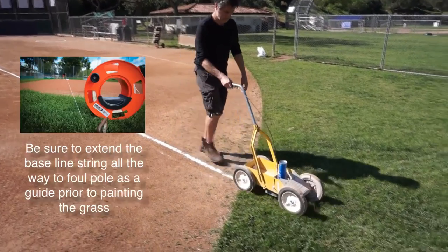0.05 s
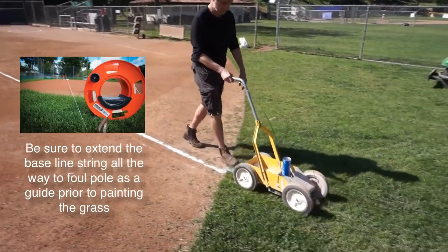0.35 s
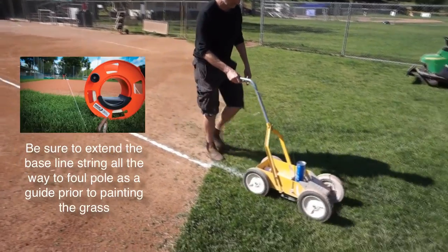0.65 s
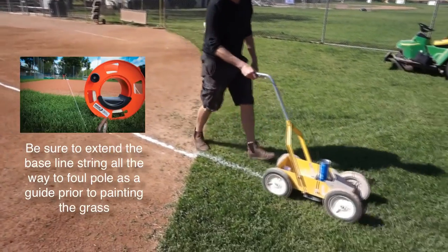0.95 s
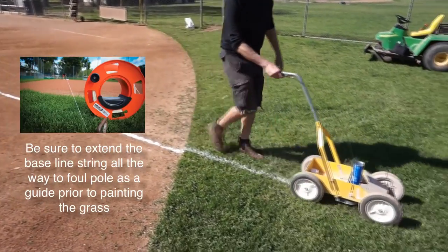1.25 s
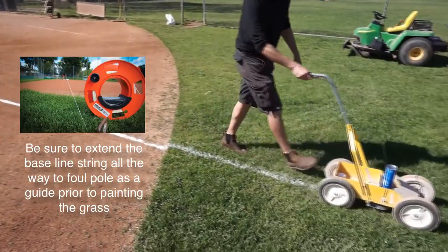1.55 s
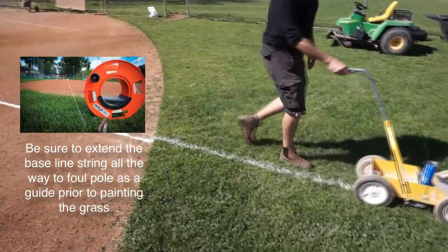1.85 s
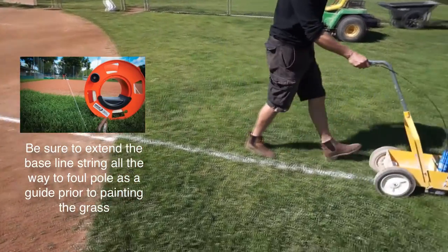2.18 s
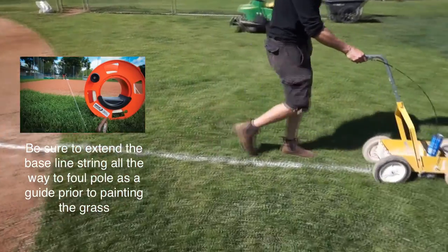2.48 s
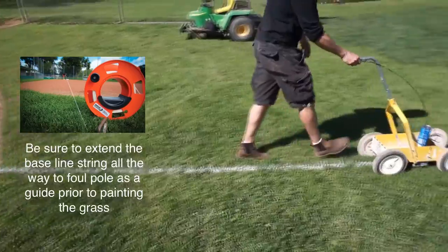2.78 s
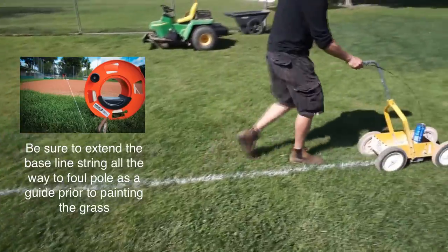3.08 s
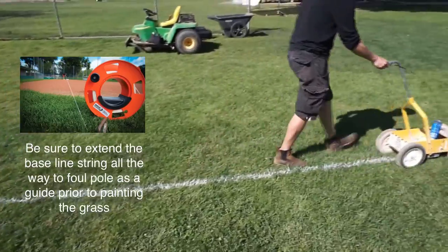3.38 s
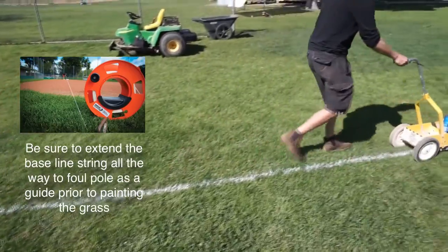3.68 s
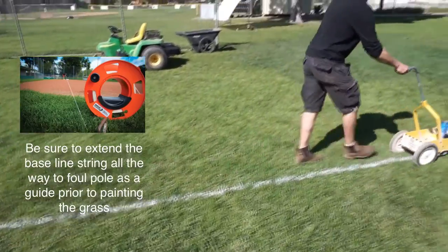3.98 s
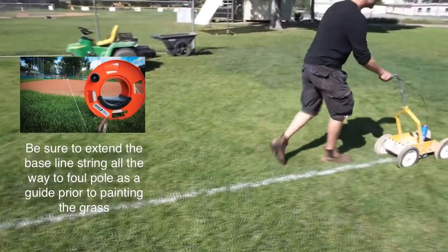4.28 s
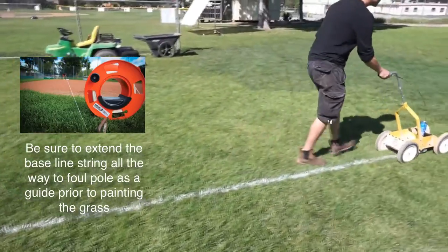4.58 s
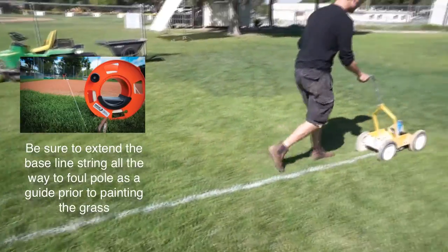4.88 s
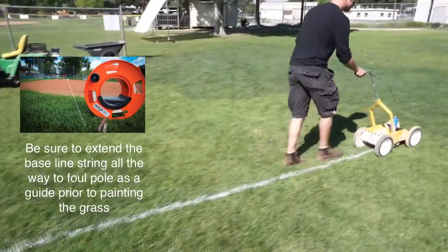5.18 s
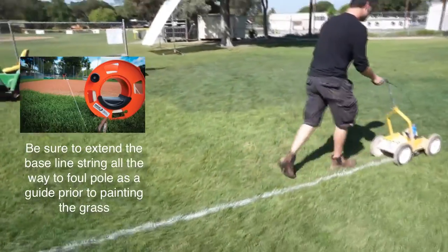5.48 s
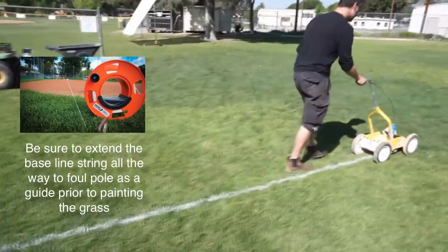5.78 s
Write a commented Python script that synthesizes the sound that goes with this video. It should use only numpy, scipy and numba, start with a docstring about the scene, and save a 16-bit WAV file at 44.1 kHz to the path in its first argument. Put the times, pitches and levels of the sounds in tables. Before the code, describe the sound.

A paint sprayer hisses steadily as its cart rolls and rattles over grass, with wind rumbling on the microphone.

```python
"""A line marker passing on a lawn

A four-wheeled cart is pushed past the microphone and away, its aerosol can spraying all the time.
The turbulent jet excites resonances of the steel chassis, the tyres crunch through grass, and bumps
set off clacks, rattles and thuds. A small engine drones far off, and wind buffets the microphone."""
import sys
import numpy as np
from scipy import signal
from scipy.fft import rfft, irfft
from scipy.io import wavfile
from scipy.ndimage import uniform_filter1d, map_coordinates
from numba import njit

SR = 44100
rng = np.random.default_rng(int(sys.argv[2]) if len(sys.argv) > 2 else 0)


def generate_wav(sig):
    """Save sig (samples, or channels by samples) to the path in sys.argv[1] as 16-bit PCM at SR."""
    pcm = np.round(np.clip(np.atleast_2d(sig).T, -1, 1) * 32767).astype(np.int16)
    wavfile.write(sys.argv[1], SR, pcm)


N = 266805
TIME = np.arange(N) / SR
FREQ = np.fft.rfftfreq(N, 1 / SR)
SIDES = np.array([[1], [-1]])  # left and right microphone ports

# loudness of the hiss: t/s, level/dB
JET_LEVEL = [(0.0, -31), (0.95, -33), (1.2, -35.5), (1.65, -35.5), (1.9, -33), (2.25, -32), (2.5, -30),
             (3.2, -31), (3.75, -32), (4.1, -39.5), (4.75, -38.5), (6.05, -40.5)]
# spectrum of the jet: f/Hz, relative level/dB
JET_SPECTRUM = [(1000.0, -17.5), (2100.0, -1.5), (2850.0, -1), (3600.0, -0.5), (5000.0, -0.5),
                (6200.0, 2.2), (8000.0, 3.5), (10500.0, 3.5), (12500.0, 2.5), (14500.0, -0.5),
                (16000.0, -10)]
# reflection off the chassis wall: t/s, delay/ms, coefficient (negative inverts)
WALL_REFLECTION = [(0, 0.37, 0.11), (.7, 0.35, -0.18), (1.2, 0.37, -0.017), (1.55, 0.44, -0.13),
                   (2.15, 0.39, 0.037), (2.65, 0.34, 0.28), (3.05, .37, -0.16), (3.5, 0.4, -0.11),
                   (4.6, 0.35, -0.081), (6.05, 0.43, 0.00058)]
# chassis resonances, beamed at the microphone in turn:
# f/Hz, bandwidth/Hz, relative level/dB, facing at t/s, half-duration/s, glide/(Hz/s)
CAVITY_MODES = [(3600, 540, -8, 1.5, .7, -100), (4300, 770, -3.5, 1.3, 0.42, 200),
                (3900, 300, -10.5, 3.06, 0.33, 696), (5100, 270, -9.5, 5.35, 0.66, 50),
                (5370, 650, -11, 2.66, 0.13, 1300), (6960, 380, -3.5, 0.11, 0.13, -300),
                (7140, 520, -7, .75, .3, 600), (6650, 800, -2.5, 1.27, 0.17, -1200),
                (7040, 670, -3, 1.95, 0.26, 1500), (6900, 380, -3.5, 3.2, 0.12, 400),
                (6830, 250, -7.5, 4.54, 0.81, -80), (8330, 310, -7, 0.42, 0.27, 500),
                (8400, 500, 2, 2.7, 0.063, 300), (7950, 660, -8, 3.55, 0.38, -300),
                (8900, 730, -3, 4.86, 0.99, -60), (9200, 540, -4.5, 2.44, .17, 1803),
                (9500, 1100, -5, 0.98, .15, -1500), (4100, 320, -16.5, 4.8, .9, 0),
                (6700, 470, -11, 2.5, 0.081, 0), (10700, 1500, -7.5, 0.46, 0.75, 400)]


def spray(scatter=0.71, sputter_db=1.0, sway_db=0.9, shadow_s=5, shadow_db=-31, shadow_hz=6000):
    """Turbulence radiates broadband noise, comb-filtered by the wall and joined by cavity resonances."""
    wall_ms, reflection = curves(WALL_REFLECTION)
    jet = colour(noise(), JET_SPECTRUM)
    jet = jet + reflection * delay(jet, wall_ms)
    jet = jet + scatter * scattered(jet)
    shadow = undb(shadow_db * smooth_step(shadow_s, 0.096))  # from behind, the chassis hides high modes
    for hz, width_hz, db, facing, half, glide in CAVITY_MODES:
        centre_hz = gliding(hz, glide, facing, half)
        ring = unit(resonate(resonate(noise(), centre_hz, width_hz), centre_hz, 2 * width_hz))
        beam = undb(db + sway_db * walk(9.6)) * swell(facing, half)
        jet = jet + ring * beam * (shadow if hz > shadow_hz else 1)
    return jet * undb(curves(JET_LEVEL)[0] + sputter_db * walk(26))


def scattered(x, t60=0.019, hop=5000):
    """Multiple scattering among wheels and frame: the echo pattern fades into a new one every hop."""
    out, age = np.zeros(N), TIME[:1024]
    decay = np.exp(-np.log(1000) * age / t60) * (age > .001)
    window = signal.windows.cosine(2 * hop)
    for start in range(0, N, hop):
        piece = x[start:start + 2 * hop]
        tail = rng.standard_normal(len(age)) * decay
        echo = signal.fftconvolve(piece * window[:len(piece)], tail / np.linalg.norm(tail))
        out[start:start + len(echo)] += echo[:N - start]
    return out


# loudness of rolling: t/s, level/dB
ROLLING_LEVEL = [(0.0, -35), (0.3, -35.5), (1.1, -38.5), (1.7, -36.5), (2.35, -33), (2.75, -29),
                 (3.15, -28), (3.45, -26.5), (3.83, -29), (3.95, -35), (5.1, -35), (6.05, -36)]
# spectrum of crushed grass: f/Hz, relative level/dB
GRASS_SPECTRUM = [(150, 6.5), (300, 2.5), (450, -5), (700, -1.5), (1100, 1.5), (1700, -2.5), (2050, -3.5),
                  (2800, -8), (3500, -10), (5000, -9.5), (8000, -18), (15000, -30)]
# brief scuffs through the grass: t/s, peak level/dB, half-duration/s
GRASS_SCUFFS = [(2.692, -29, .03), (3.398, -29, 0.024), (4.26, -35.5, 0.072), (4.46, -39, 0.09),
                (4.8, -33, 0.041), (5.098, -35, 0.051), (5.344, -36.5, 0.12)]
# deck resonances driven by rolling: f/Hz, bandwidth/Hz, gain/dB
DECK_MODES = [(714, 120, -9), (1090, 350, -13), (2050, 160, -9.5)]


def wheels(crunch=0.45, uneven_db=0.69, jolt_gain=0.086, press_s=0.018, jolt_t60=0.33):
    """Friction and fracture: grass brushes and snaps under the tyres, forcing the deck to vibrate."""
    blades = noise() + crunch * grains(rate=900, spread_db=2.5)
    # each clack marks a jolt that presses the tyres harder into the grass
    jolts = np.max([burst(start, press_s, jolt_t60) for start, *_ in PART_IMPACTS], axis=0)
    rolling = (1 + jolt_gain * jolts) * undb(curves(ROLLING_LEVEL)[0] + uneven_db * walk(17))
    scuffs = sum(undb(db) * swell(peak_s, half) for peak_s, db, half in GRASS_SCUFFS)
    rustle = colour(blades, GRASS_SPECTRUM)
    return unit(rustle + modal_response(rustle, DECK_MODES)) * np.hypot(rolling, scuffs)


# loose parts striking the frame: t/s, level/dB, treble gain/dB, ring f/Hz
PART_IMPACTS = [(0.022, -28, -6, 1520), (0.081, -25, -27, 1240), (.632, -23.5, -19, 2170),
                (1.798, -28.5, -9, 1640), (1.973, -30, -16, 1700), (2.012, -24, -5.5, 1630),
                (2.198, -29.5, 0, 2070), (2.468, -26, 0.5, 2050), (2.501, -21, -7, 1660),
                (2.7855, -20, -4.5, 2040), (2.837, -26, -2, 1680), (2.851, -19.5, -7.5, 1260),
                (3.427, -21.5, -6.5, 2110), (3.72, -27.5, 3.5, 2280), (3.957, -31, 3, 2260),
                (4.028, -27.5, 2, 2170), (4.379, -32, -2, 2270), (4.987, -28, 1.5, 1910),
                (5.054, -31.5, -7, 1910), (5.064, -38, -8, 2500), (5.86, -32.5, -0.5, 2300),
                (5.939, -31.5, -3.5, 1900)]
# modes of the steel frame: f/Hz, bandwidth/Hz, gain/dB
FRAME_MODES = [(1045, 37, 5.5), (2600, 35, -12), (4220, 200, -1.5), (5070, 260, 3), (6550, 710, 4),
               (8240, 690, -9)]


def clacks(chatter=0.47, split_hz=4500, part_ring=1.73, part_width_hz=420):
    """Impact excitation: a brief chattering contact rings the loose part and the modes of the frame."""
    contacts = noise() + chatter * grains(rate=1400, spread_db=5.0)
    contacts = colour(contacts, [(300, -9), (800, -3.0), (1700, 3.5), (2800, 2.5), (4200, 1.5),
                                 (6500, -0.5), (9500, 7.0), (12000, -4.5), (16000, -35)])
    top = treble(contacts, split_hz)
    force, parts = 0, 0
    for start, db, treble_db, hz in PART_IMPACTS:
        envelope = undb(db) * burst(start, rise=0.001, t60=0.069, hold=0.0051)
        blow = envelope * (contacts - top + undb(treble_db) * top)
        force = force + blow
        parts = parts + resonate(blow, hz, part_width_hz)
    return force + part_ring * parts + modal_response(force, FRAME_MODES)


def rattle(rise=0.012, t60=0.22, relative_db=-11):
    """Repeated collisions: small fittings jiggle after each jolt with a decaying, gritty patter."""
    shaking = np.max([undb(db) * burst(start, rise, t60) for start, db, *_ in PART_IMPACTS], axis=0)
    ticks = grains(rate=600, spread_db=2.0)
    patter = colour(ticks, [(300, -15), (900, 5), (2200, -1), (5500, -8.5), (12000, -23)])
    return patter * shaking * undb(relative_db)


# hollow knocks of the chassis: t/s, peak level/dB, f/Hz
CHASSIS_KNOCKS = [(0.027, -30, 660), (0.049, -28.5, 465), (.08, -35, 640), (.228, -34.5, 540),
                  (.635, -34, 494), (0.654, -32, 720), (1.23, -35.5, 440), (1.8, -33, 360),
                  (2.017, -34.5, 326), (2.495, -29.5, 316), (2.508, -34, 563), (2.68, -33, 420),
                  (2.792, -29, 340), (3.37, -31, 506), (3.48, -29.5, 296), (3.72, -31.5, 298),
                  (4.801, -36.5, 250), (5.06, -37, 340)]


def bumps(rise=0.013, width_hz=300, t60_cycles=110):
    """Damped vibration: each thud of the chassis lasts equally many cycles, so low ones ring longer."""
    thuds = 0
    for start, db, hz in CHASSIS_KNOCKS:
        ring = unit(resonate(resonate(noise(), hz, width_hz), hz, 3 * width_hz))
        thuds = thuds + undb(db) * burst(start, rise, t60_cycles / hz) * ring
    return thuds


# cancellations: f/Hz, bandwidth/Hz, depth (0-1), deepest at t/s, half-duration/s, glide/(Hz/s)
PATH_NOTCHES = [(2880, 440, 0.55, 1.2, 0.51, -80), (4940, 710, 0.64, 1.04, 1, -100),
                (3220, 500, 0.8, 2.22, 0.2, -300), (4260, 350, 0.5, 2.5, 0.21, 1100),
                (4800, 310, 0.54, 3.2, 0.75, -100), (5800, 550, 0.4, 4.1, 1, -300)]


def multipath(x):
    """Destructive interference of paths round the wheels cuts notches that slide as the cart moves."""
    for hz, width_hz, depth, deepest, half, glide in PATH_NOTCHES:
        band = resonate(x, gliding(hz, glide, deepest, half), width_hz)
        x = x - depth * swell(deepest, half) * band
    return x


# reflection off the lawn: t/s, delay/ms, coefficient (negative inverts)
LAWN_REFLECTION = [(0, 0.47, -0.058), (1.2, 0.62, -0.0076), (2.1, 0.644, -0.074), (2.35, 0.72, -0.019),
                   (2.65, 0.68, -0.21), (3.05, 0.68, 0.066), (3.6, 0.76, -0.1), (3.95, 0.64, 0.012),
                   (5, 1.43, 0.044), (6.05, 1.4, -0.048)]


def ground_effect(x):
    """Direct and ground-reflected waves interfere, forming a shifting comb filter."""
    delay_ms, reflection = curves(LAWN_REFLECTION)
    return x + reflection * delay(x, delay_ms)


# direction of the cart: t/s, offset from the microphone axis (0-1)
CART_BEARING = [(0, .02), (1.55, 0.03), (2.1, 0.52), (4, 0.86), (6.05, 0.16)]


def at_ports(cart, port_lag_ms=0.053, treble_spread=0.54, spread_hz=4800, top_hz=11500):
    """Path difference and lost coherence: as the cart moves right, its treble differs between ports."""
    off_axis, = curves(CART_BEARING)
    lag_ms, spread = port_lag_ms * off_axis, treble_spread * off_axis
    diffuse = spread * multipath(spray())
    gradient = (delay(cart, lag_ms) - delay(cart, -lag_ms)) / 4
    # off axis, the shortest waves are shared least
    mid = cart - spread * treble(cart, top_hz)
    side = treble(gradient + diffuse, spread_hz) + treble(diffuse, top_hz)
    return mid + SIDES * side


# loudness of the far engine: t/s, level/dB
ENGINE_LEVEL = [(0, -41), (1.55, -36), (1.9, -29.5), (2.1, -41.5), (2.27, -27.5), (2.45, -32), (3, -27.5),
                (3.4, -25.5), (3.8, -24.5), (4, -34), (6.05, -37.5)]


def engine(hum_hz=132.24, sag_hz=9, wander=0.0067, waver=0.34, overtone_db=-19.5, left_db=2.6):
    """Periodic exhaust flow gives a note that wavers in the wind; uneven firing adds half orders."""
    hz = hum_hz - sag_hz * smooth_step(3.2, 1.2)
    phase = 2 * np.pi * np.cumsum(hz * (1 + wander * walk(7.5))) / SR
    drone = 0
    for order, gain in (1, 1), (5 / 2, undb(overtone_db)), (7 / 2, undb(overtone_db) / 2):
        in_phase = (1 + waver * walk(27.0)) * np.sin(order * phase)
        quadrature = waver * walk(8.5) * np.cos(order * phase)
        drone = drone + gain * (in_phase + quadrature)
    return unit(drone) * undb(curves(ENGINE_LEVEL)[0] + SIDES * left_db)


# strength of the wind's rumble: t/s, level/dB
WIND_LEVEL = [(0, -11), (.22, -13.5), (.6, -5), (.95, -12.5), (1.12, -13.5), (1.56, -7), (1.66, -15.5),
              (2.48, -20), (2.68, -9), (2.85, -10), (3, -14), (3.2, -9.5), (3.4, -22), (3.8, -11),
              (4.8, -15), (5.15, -16.5), (5.55, -4.5), (6.05, -8.5)]
# single eddies striking the ports: t/s, peak level/dB, half-duration/s
EDDY_STRIKES = [(0.58, -22, 0.061), (1.132, -10.5, 0.17), (1.467, -15.5, 0.09), (3.836, -14.5, 0.21),
                (4.353, -21, 0.21), (5.554, -20.5, 0.12)]
# spectra of the wind's pressure: f/Hz, relative level/dB
RUMBLE_SPECTRUM = [(3, 0), (8, -40), (15, 27), (26, 9), (42, 9), (55, -6.5), (75, -43), (120, -74)]
BUFFET_SPECTRUM = [(30, -3), (55, 0), (80, 1), (105, -2.5), (150, -7.5), (220, -26.5), (350, -26),
                   (800, -72), (3000, -83)]
THUMP_SPECTRUM = [(15, -4), (35, 2), (55, 4), (80, -10.5), (120, -21), (200, -32), (500, -54), (3000, -93)]


def wind(ceiling=0.89, buffet_db=-30, buffet_follow=0.13, flutter_db=2.0):
    """Turbulent pressure, only partly coherent between the ports, rumbles, buffets and thumps."""
    rumble_db, = curves(WIND_LEVEL)
    rumble = (eddies(RUMBLE_SPECTRUM) + .8 * SIDES * eddies(RUMBLE_SPECTRUM)) * undb(rumble_db)
    swirl = eddies(BUFFET_SPECTRUM)
    buffet = eddies(BUFFET_SPECTRUM) + .6 * SIDES * (swirl - treble(swirl, 220))
    buffet = buffet * undb(buffet_db + buffet_follow * rumble_db + flutter_db * walk(7.6))
    strikes = sum(undb(db) * swell(peak_s, half) for peak_s, db, half in EDDY_STRIKES)
    thumps = (eddies(THUMP_SPECTRUM) + SIDES * eddies(THUMP_SPECTRUM) / 2) * strikes
    return ceiling * np.tanh((rumble + thumps) / ceiling) + buffet  # the strongest swings saturate


def eddies(spectrum, evenness=0.15):
    """Envelope compression of low noise makes successive swirls more alike in strength."""
    x = colour(noise(), spectrum)
    strength = uniform_filter1d(np.abs(signal.hilbert(x)), size=1500)
    return unit(x / strength ** evenness)


# spectrum of the open air: f/Hz, relative level/dB
AMBIENT_SPECTRUM = [(60, 23.5), (170, 12.5), (280, -3), (450, 11), (720, 9), (1150, -9), (1500, -19),
                    (2500, -50), (6000, -50), (15000, -53)]


def open_air(level_db=-38.5, side=0.2):
    """Ambient noise reaches two closely spaced ports largely in phase."""
    shared = colour(noise(), AMBIENT_SPECTRUM)
    return (shared + side * SIDES * colour(noise(), AMBIENT_SPECTRUM)) * undb(level_db)


def undb(db):
    """Decibels to amplitude ratio."""
    return 10 ** (np.asarray(db) / 20)


def unit(x):
    """Normalisation to rms 1."""
    return x / np.sqrt(np.mean(x ** 2))


def curves(rows):
    """Linear interpolation in time of each column after the first."""
    times, *columns = np.transpose(rows)
    return [np.interp(TIME, times, column) for column in columns]


def noise():
    """Gaussian white noise."""
    return rng.standard_normal(N)


def grains(rate, spread_db):
    """Shot noise: rate random clicks a second, a few much larger than the rest."""
    clicks = (rng.random(N) < rate / SR) * noise()
    return unit(clicks * undb(spread_db * np.minimum(rng.exponential(size=N), 4)))


def walk(rate, size=2048):
    """Band-limited fluctuation of rms 1, changing about rate times a second."""
    step = N / SR / size
    low_pass = np.exp(-(np.fft.rfftfreq(size, step) / rate) ** 2)
    slow = irfft(rfft(rng.standard_normal(size)) * low_pass)
    return np.interp(TIME, step * np.arange(size), unit(slow))


def burst(start, rise, t60, hold=0):
    """Envelope of a blow: linear rise, hold, then exponential decay."""
    age = np.maximum(TIME - start, 0)
    return np.minimum(age / rise, 1) * np.exp(-np.log(1000) * np.clip((age - rise - hold) / t60, 0, 2))


def swell(centre, half):
    """Gaussian envelope, down to 1/e at half seconds from its centre."""
    return np.exp(-((TIME - centre) / half) ** 2)


def smooth_step(centre, half):
    """Sigmoid transition from 0 to 1."""
    return (1 + np.tanh((TIME - centre) / half)) / 2


def gliding(hz, hz_per_s, centre, half, sway=0.008):
    """Frequency modulation: a linear glide about time centre, with drift as the cart sways."""
    return (hz + hz_per_s * np.clip(TIME - centre, -2 * half, 2 * half)) * (1 + sway * walk(4.6))


def colour(x, spectrum):
    """Spectral shaping by (f/Hz, level/dB) points, at rms 1."""
    hz, db = np.transpose(spectrum)
    return unit(irfft(rfft(x) * undb(np.interp(np.log(FREQ + 1), np.log(hz), db)), N))


def treble(x, hz):
    """Zero-phase high-pass above hz."""
    return irfft(rfft(x) * (1 - 1 / (1 + (FREQ / hz) ** 6)), N)


def delay(x, ms):
    """Time-varying propagation delay."""
    return map_coordinates(x, [np.arange(N) - ms * SR / 1000], order=3, mode="wrap")


@njit
def svf(x, hz, width_hz):
    """State-variable band-pass whose centre may move every sample."""
    y, band_state, low_state = np.empty(len(x)), 0., 0.
    for i in range(len(x)):
        gain, damping = np.tan(np.pi * hz[i] / SR), width_hz / hz[i]
        band = (band_state + gain * (x[i] - low_state)) / (1 + gain * (gain + damping))
        band_state, low_state = 2 * band - band_state, low_state + 2 * gain * band
        y[i] = damping * band
    return y


def resonate(x, hz, width_hz):
    """Forced response of one resonance, steady or moving."""
    return svf(x, hz * np.ones(len(x)), float(width_hz))


def modal_response(force, modes):
    """Superposition of modes driven by one force."""
    return sum(undb(db) * resonate(force, hz, width_hz) for hz, width_hz, db in modes)


def scene():
    """Superposition at the two ports: the cart over the lawn, then engine, wind and open air."""
    cart = multipath(spray() + wheels() + rattle()) + clacks() + bumps()
    return at_ports(ground_effect(cart)) + engine() + wind() + open_air()


def record(dry):
    """Clipping and band limiting: peaks stop at full scale, and the top is cut steeply."""
    low_pass = signal.ellip(10, .2, 80, 15750, fs=SR, output="sos")
    return signal.sosfilt(low_pass, np.clip(dry, -1, 1))


dry = scene()
out = record(dry)
generate_wav(out)
```